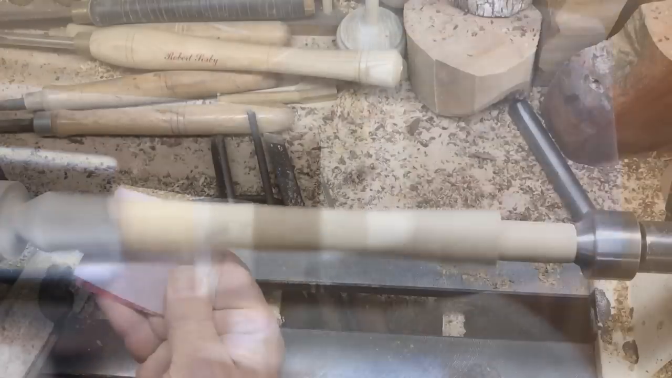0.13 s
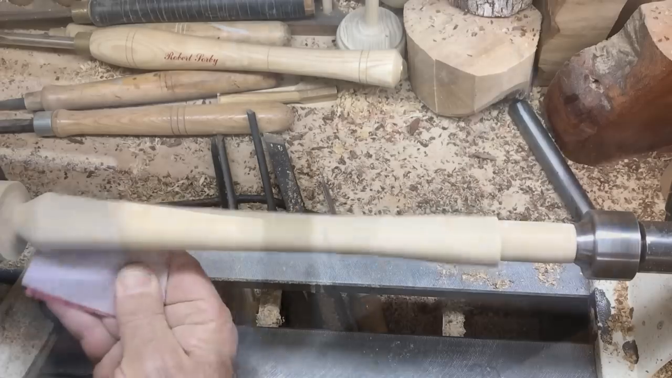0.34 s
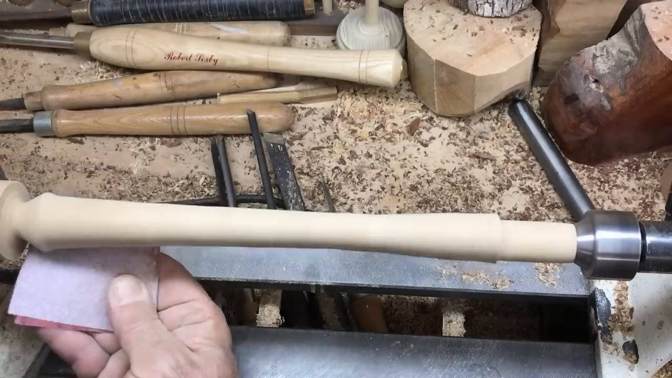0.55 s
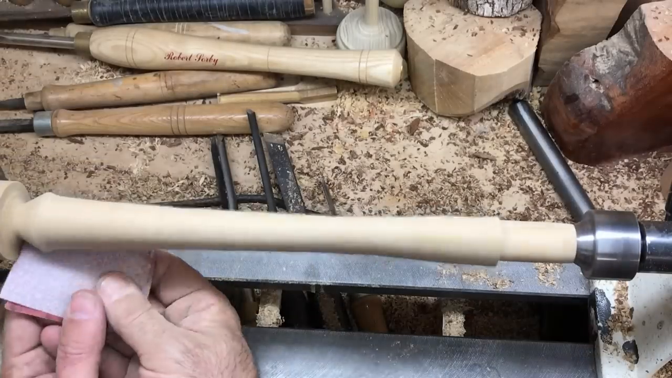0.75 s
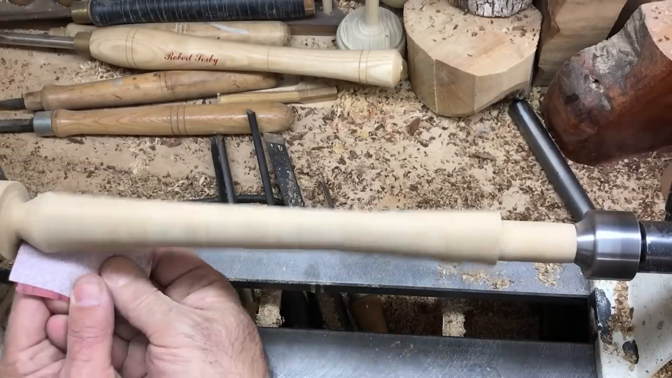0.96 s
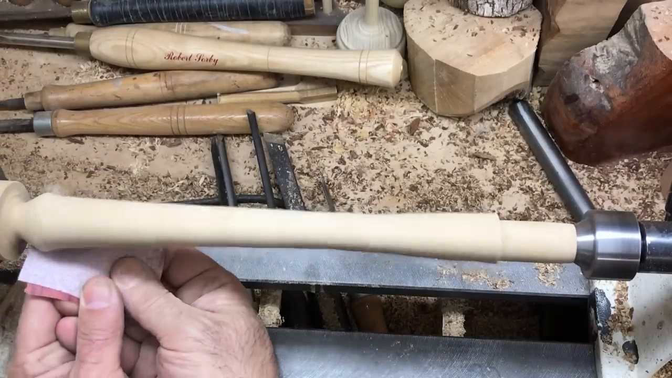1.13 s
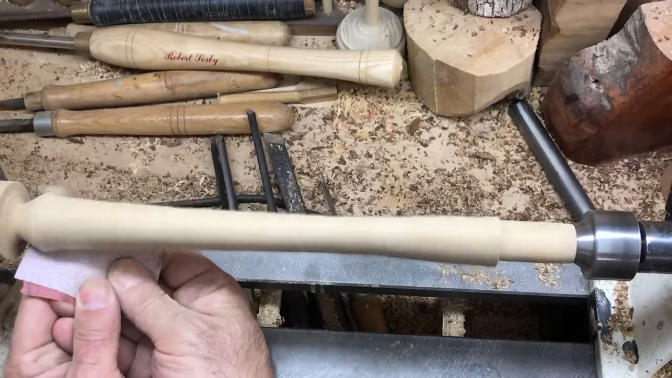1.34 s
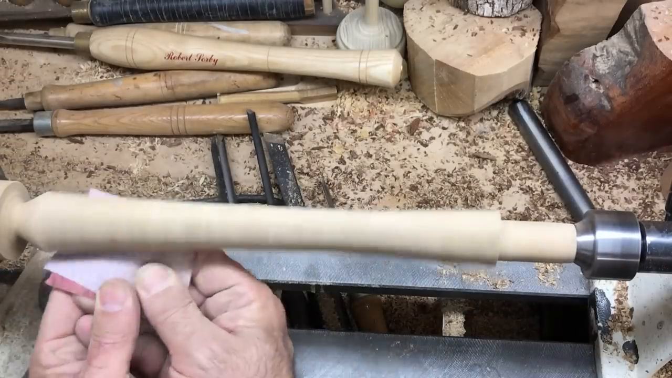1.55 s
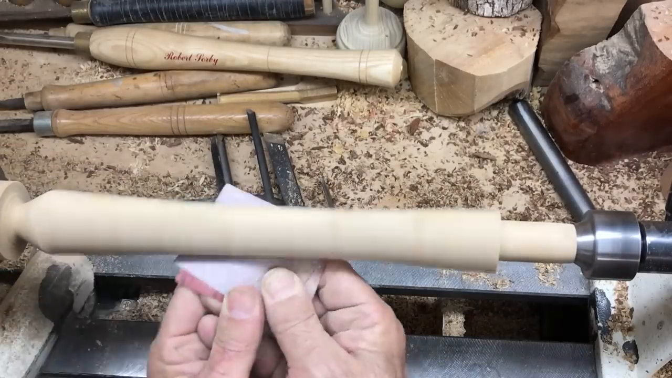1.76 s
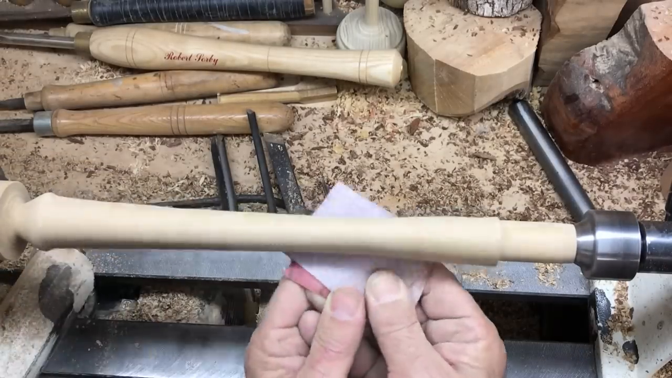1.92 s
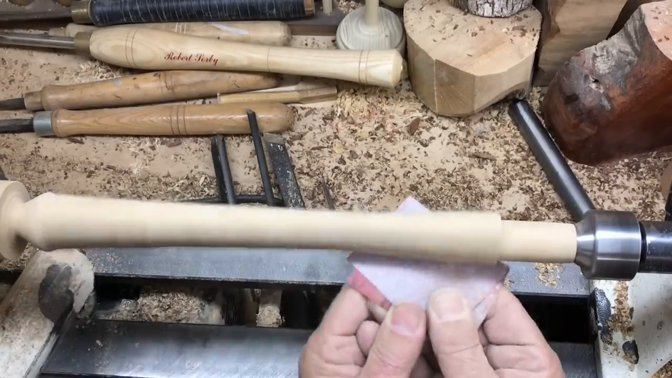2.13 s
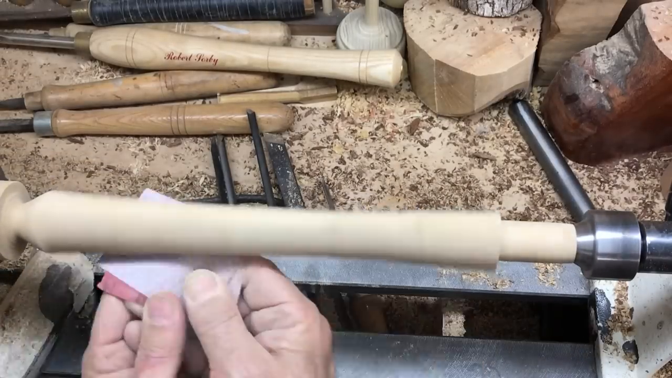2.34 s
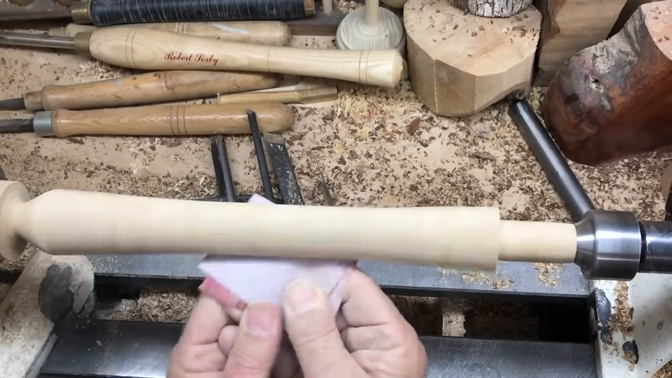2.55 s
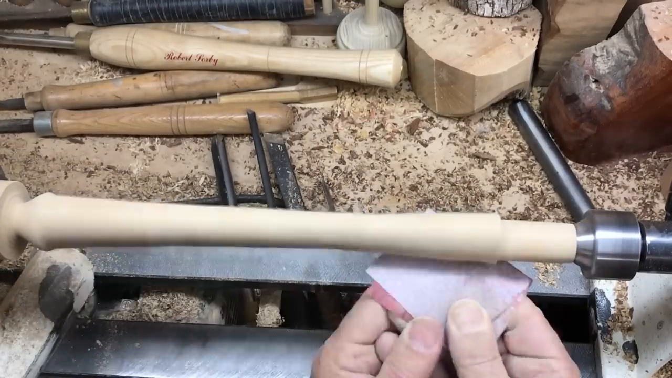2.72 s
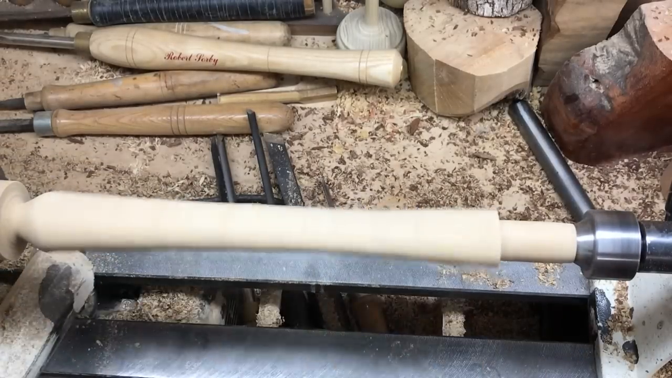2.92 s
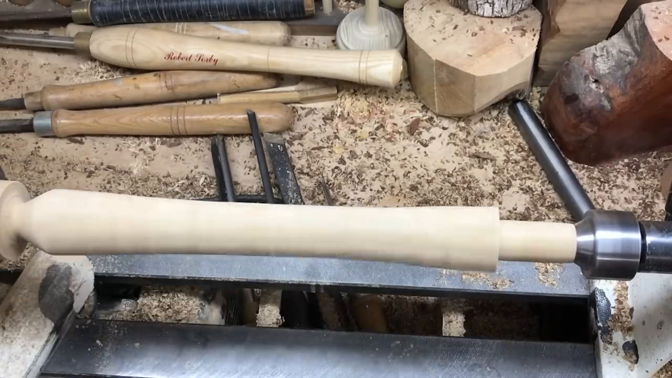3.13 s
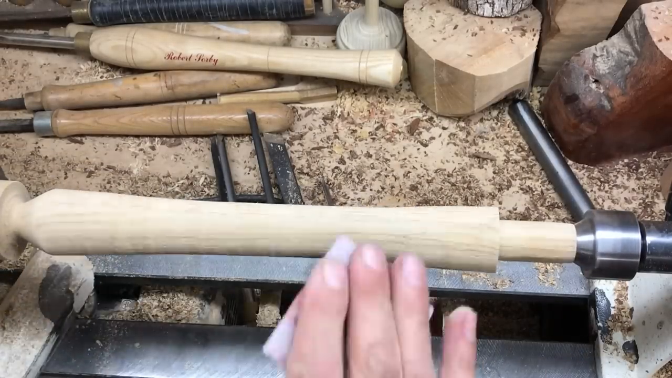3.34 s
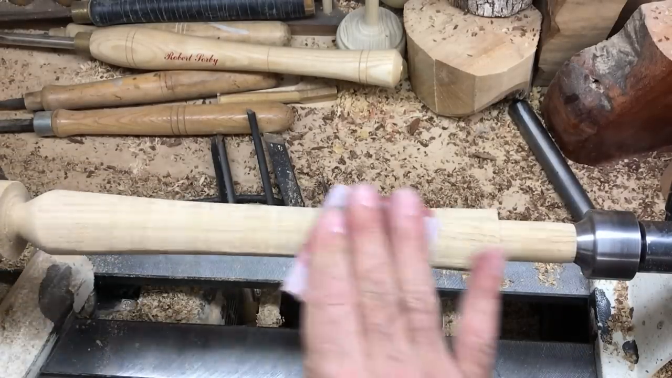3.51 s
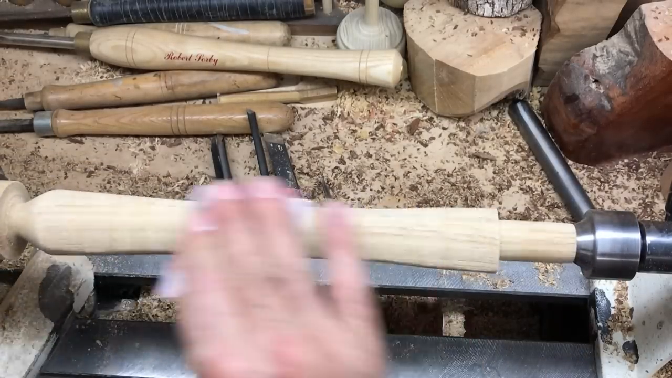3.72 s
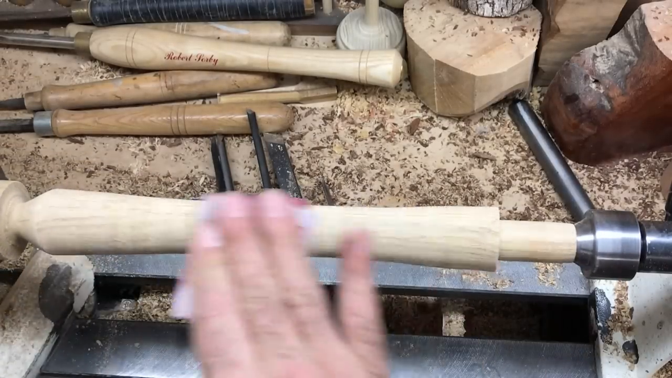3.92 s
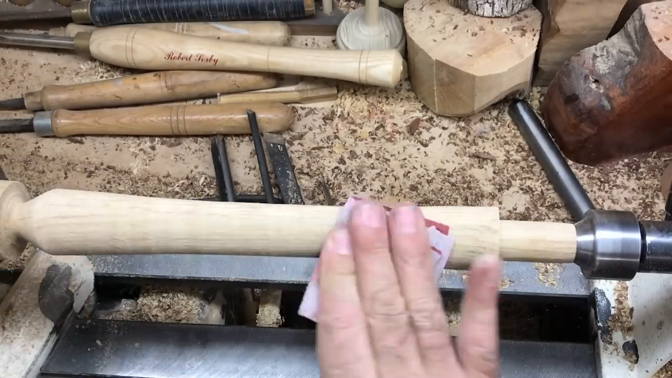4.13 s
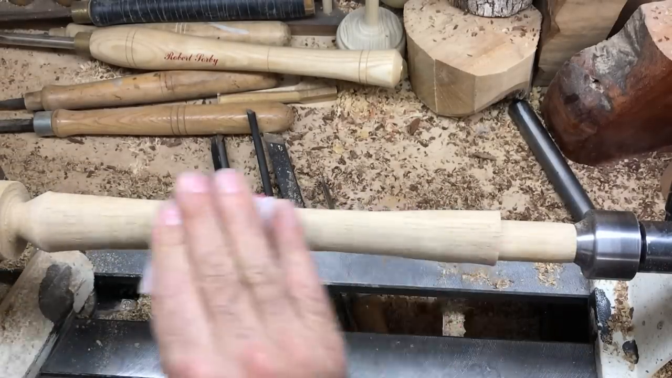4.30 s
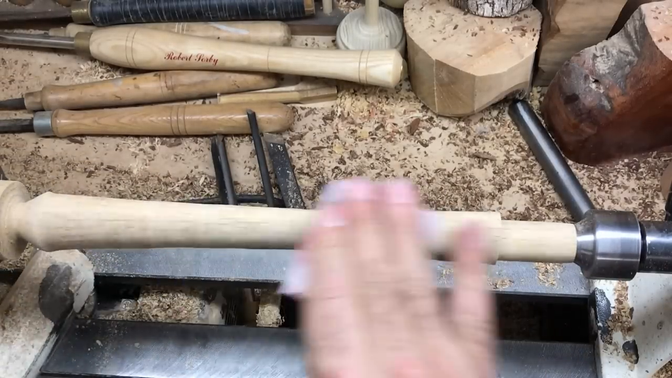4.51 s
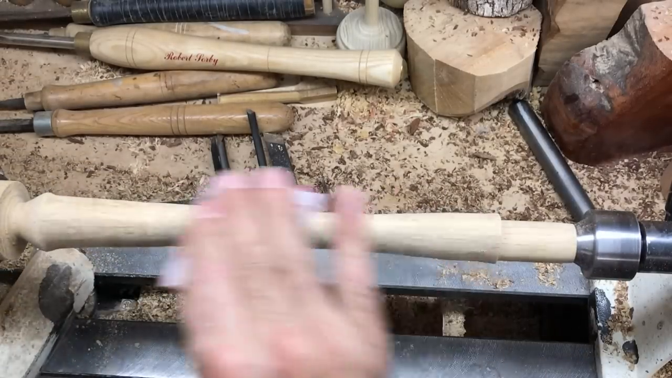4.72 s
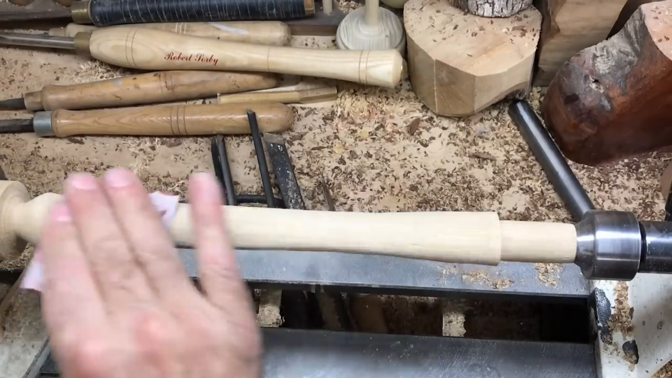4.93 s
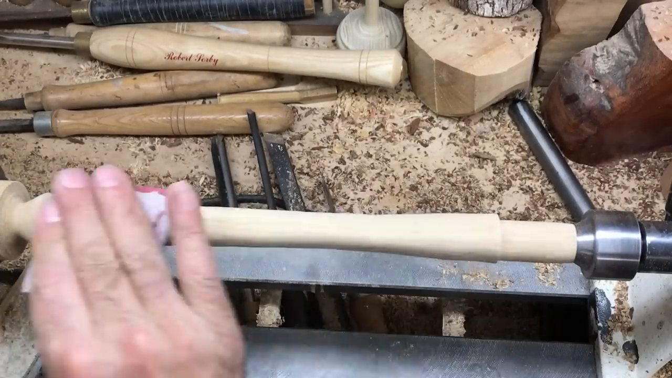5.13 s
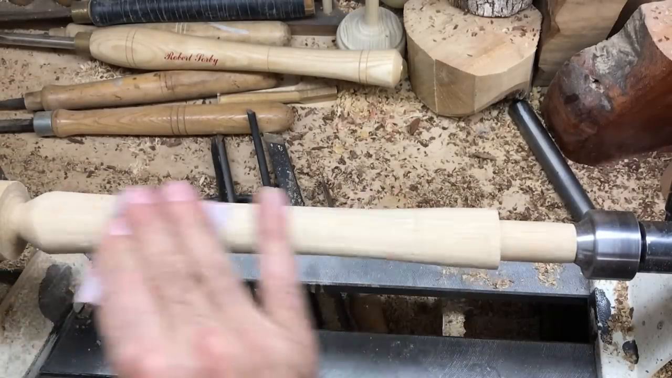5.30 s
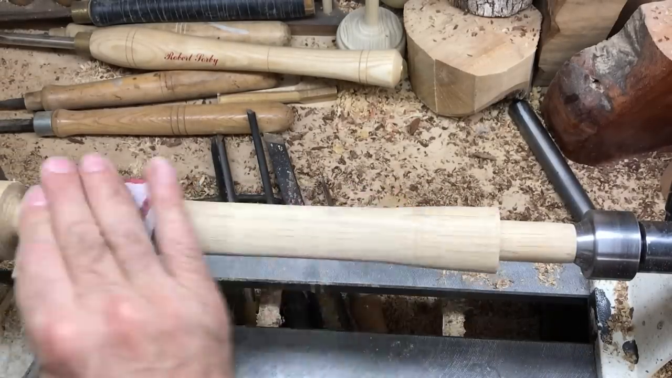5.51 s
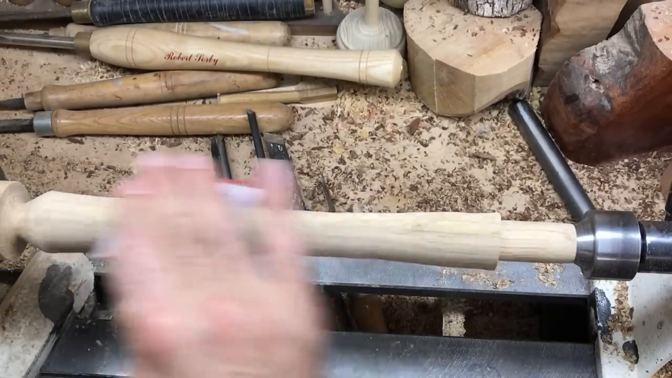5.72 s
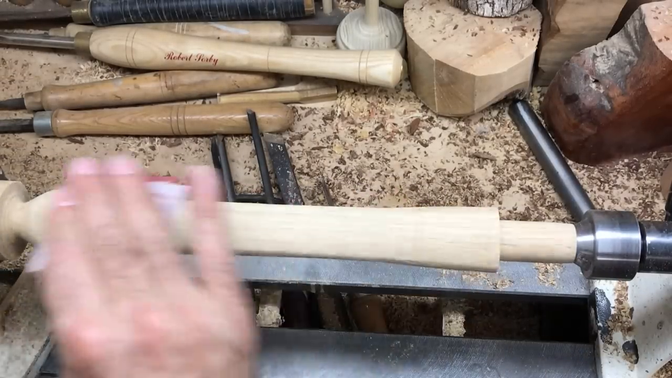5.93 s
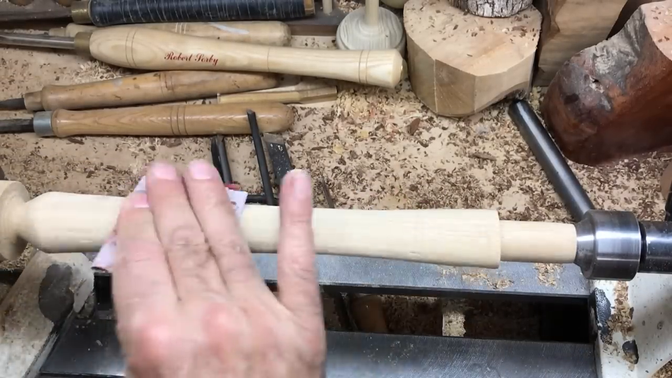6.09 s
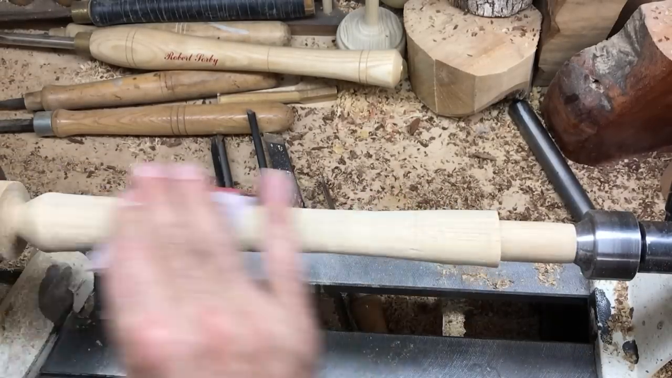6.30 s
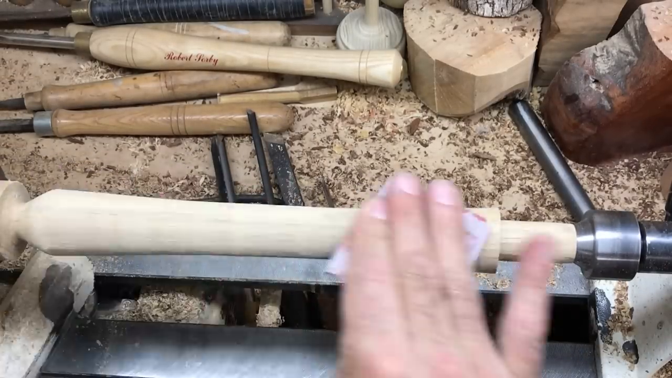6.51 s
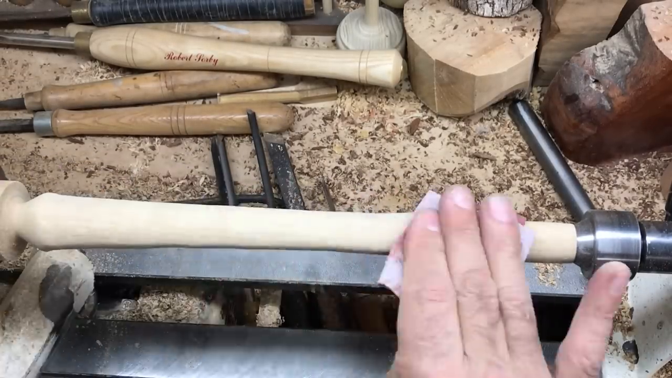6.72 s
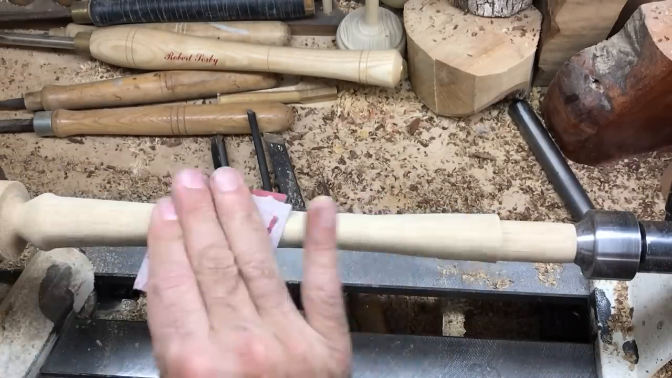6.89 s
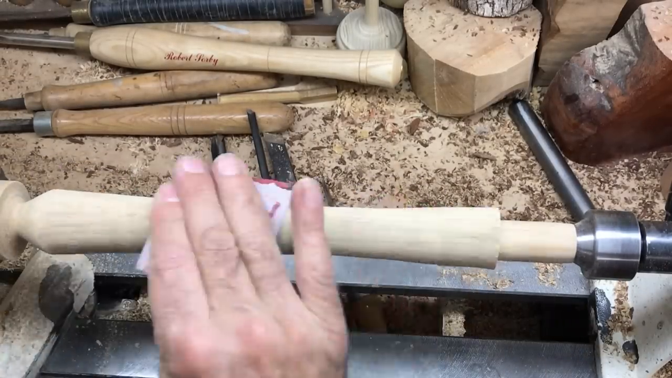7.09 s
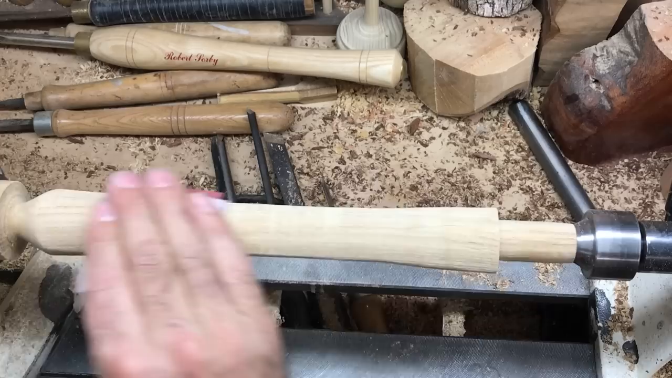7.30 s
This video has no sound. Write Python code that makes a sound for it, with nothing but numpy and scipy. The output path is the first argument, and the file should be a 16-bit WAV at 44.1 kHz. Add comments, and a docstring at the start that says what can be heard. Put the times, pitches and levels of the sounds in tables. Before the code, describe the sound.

A close microphone catches gritty sandpaper hiss on turning wood, briefly interrupted early, with small snags and a low electric hum beneath. Around three seconds the hiss stops, a switch snaps and the lathe falls silent. Paper rustles faintly, then very rapid dry scrubbing runs along the wood, pulsing about fourteen push-and-pull cycles a second, in a quiet workshop with very short echoes.

```python
"""In a small workshop, sandpaper is held against a wooden handle spinning on a humming lathe, close by.
The paper lifts, the switch clacks and the spindle runs down; then the still handle is rubbed along its
grain in very quick back-and-forth strokes. Abrasion is random clicks in noise, filtered by wood and paper
resonances and shaped by contact or hand speed. The motor is sine partials; bearings and air are noise."""
import sys
import numpy as np
from scipy import signal
from scipy.fft import rfft, irfft
from scipy.io import wavfile
from scipy.ndimage import uniform_filter1d

SR = 44100
rng = np.random.default_rng(int(sys.argv[2]) if len(sys.argv) > 2 else 0)


def int16_out(signal):
    """Quantize to a 16-bit WAV file."""
    q = np.round(np.clip(np.atleast_2d(signal).T, -1, 1) * 32767)
    wavfile.write(sys.argv[1], SR, q.astype(np.int16))


N = 324135
TIME = np.arange(N) / SR
BINS = np.fft.rfftfreq(N, 1 / SR)
CUTOFF_HZ = 15850

# All spectra below: frequency_hz, relative_density_db.
# All resonances and notches below: centre_hz, width_hz, height_db.

# air of the workshop, a spectrum
AIR_SPECTRUM = [(20, -16), (55, 2.5), (120, 0.5), (300, -16.5), (600, -8), (1000, -13), (3000, -31),
                (16000, -27)]
# mains hum of the motor: time_s, level_db (before the partials' own levels)
HUM_LEVEL = [(0.0, -54.5), (0.28, -47), (0.71, -40.5), (1.05, -42.5), (2.56, -43.5), (2.96, -41.5)]
# the motor's partials: multiple_of_mains, relative_level_db
HUM_PARTIALS = [(1, -30), (2, 1), (4, -28)]
MAINS_HZ, SWITCH_OFF_S = 60, 2.988
# the motor's faint whine
WHINE_HZ, WHINE_DB = 1254, -64
# bearings and belt: time_s, level_db
RUMBLE_LEVEL = [(0, -61), (.2, -57.5), (.5, -51), (2.95, -51), (3.04, -53), (3.15, -56), (3.27, -59),
                (3.33, -74), (3.42, -91), (3.5, -110)]
# bearings and belt, a spectrum
RUMBLE_SPECTRUM = [(20, -20), (55, -0.5), (110, -4), (170, -8.5), (260, 3), (450, -3), (800, -9),
                   (1300, -8.5), (2200, -13), (4300, -20), (6300, -24), (8000, -28.5), (16000, -37)]
# resonances of the lathe's frame and bearings
FRAME_RESONANCES = [(57.3, 16, 5), (303, 99, 2.7), (418, 49, 1.1), (554, 95, 6), (690, 69, 9),
                    (1010, 74, 3.5), (2010, 70, 3.5), (3640, 400, -1), (3960, 190, 8), (4750, 160, 3)]

# the switch: peak_s, level_db, rise_s, decay_s
CLACKS = [(2.966, -45, 0.0025, .006), (2.977, -30, 0.00086, 0.001), (2.98, -34.5, .005, 0.0048),
          (3.14, -66, .001, .004)]
# the switch, a spectrum
CLACK_SPECTRUM = [(100, -18), (600, -3), (1200, -3.5), (2400, 2), (3400, -4), (4300, -2), (8000, -4),
                  (16000, -17)]
# resonances of the switch housing
HOUSING_RESONANCES = [(560, 220, 4), (2060, 60, 7), (2480, 300, 7), (3340, 300, 12), (4000, 300, -8),
                      (4700, 300, 3)]
# the paper is gripped anew: peak_s, level_db, rise_s, decay_s
RUSTLES = [(3.275, -62.5, .015, 0.019), (3.36, -60, 0.018, 0.013), (3.395, -60, .008, .008),
           (3.411, -61, .006, .003)]
# the gripped paper, a spectrum
RUSTLE_SPECTRUM = [(150, -9), (800, -4), (1500, 4), (2200, -3), (5000, 1), (8000, -4), (16000, -11)]
# the hand bumps the handle: start_s, level_db, pitch_hz
BUMPS = [(5.89, -55, 74), (6.47, -56, 55)]

# the paper meets the spinning wood: touch_s, lift_s, ramp_s
CONTACTS = [(-.05, 0.672, 0.046), (0.771, 2.867, 0.039)]
# the paper's edge snags: centre_s, level_over_hiss_db, half_length_s
SNAGS = [(0.846, 5.5, 0.0057), (1.053, 1.5, 0.0074), (1.475, 7, 0.0068), (2.178, 4.5, 0.0083),
         (2.311, 2.5, .006), (2.754, -1, 0.0068)]
# paper at the thick end (0) or swept along the shaft (1): time_s, shaft_share
SHAFT_SHARE = [(0, 0.87), (.5, 0.24), (.85, 0.05), (1.45, 0.17), (1.6, 0.74), (2.2, 1), (2.8, 0.77)]
# pressure on the spinning wood: time_s, level_db (before trim), treble_db (before centring and gain)
PRESSURE = [(0.0, -45.9, -4), (0.17, -38, -4), (0.5, -34, -4.0), (0.565, -39, -8.5), (0.62, -37.0, -7),
            (0.82, -38, -8.6), (0.9, -38, -5), (1.0, -37.5, -4), (1.15, -37.5, -6.5), (1.42, -36.0, -6.2),
            (1.52, -34.5, -6), (1.7, -33.5, -6.5), (1.87, -33, -3), (2.0, -33, -4.5), (2.25, -32, -7.5),
            (2.41, -33, -5.1), (2.5, -33.5, -6.5), (2.8, -33.5, -4)]
# hiss at the thick end, a spectrum
END_SPECTRUM = [(200, -15.5), (600, -18), (950, -14.5), (1500, -16), (2100, -3), (3500, 0.5), (6000, -5),
                (9000, -1.5), (12000, -4), (16000, -9.5)]
# resonances of wood and paper at the thick end
END_RESONANCES = [(1330, 330, 10.5), (1870, 93, 3.5), (2120, 250, 4.5), (2800, 160, 1.5), (3200, 160, 2.5),
                  (3580, 310, 3), (4450, 300, 4.5), (6200, 900, 7), (4980, 550, -2.5), (7700, 900, 0)]
# hiss along the shaft, a spectrum
SHAFT_SPECTRUM = [(200, -42), (600, -27), (950, -18), (1400, -8.5), (2200, -2.5), (3500, -2), (6000, 0),
                  (9000, -2.5), (12000, -4.5), (16000, -10)]
# resonances of wood and paper along the shaft
SHAFT_RESONANCES = [(1380, 98, 2.6), (1710, 91, 2.1), (2045, 44, 3.3), (2640, 120, 1.9), (3015, 120, 5),
                    (3360, 120, 2.4), (3870, 82, 2.8), (4290, 220, 5), (5370, 95, 4.8)]
# bands cancelled by echoes off the lathe bed
BED_NOTCHES = [(4850, 350, -4), (7660, 600, -3), (10550, 490, -6)]

# pace of the hand on the still handle, about 14 push-and-pull cycles a second: time_s, strokes_done
PACE = [(3.46, 0), (3.493, 1), (3.577, 3), (3.949, 13), (4.08, 17), (4.285, 25), (4.337, 27), (4.481, 31),
        (4.652, 37), (4.712, 39), (4.799, 41), (5.391, 57), (5.912, 71), (6.044, 75), (6.287, 83),
        (6.42, 87), (6.644, 93), (7.339, 113)]
# how the hand bears down: time_s, level_db (before trim), treble_db (before gain),
# far_turn_dip_db (before pause trim)
GRIP = [(3.48, -37.8, 2.2, -5.5), (3.97, -36.9, 1.5, -2.5), (4.24, -42.5, -1.5, -1), (4.35, -35, 2.2, -5.5),
        (4.55, -38.5, -1.4, -2.5), (4.8, -37, -0.2, -9), (5.05, -38.5, 1.5, -1), (5.36, -39.5, -3, -6),
        (5.41, -34.5, 3.5, -5), (5.55, -36.5, 1.4, -5), (5.87, -38.0, 2, -3.9), (5.93, -39, -0.5, -9),
        (6.28, -43, -3.5, -6), (6.4, -38.5, 0.5, -7.5), (6.6, -36.5, 0.6, -3.5), (6.68, -40.0, 0.3, 0),
        (7.1, -41, -1.5, 0), (7.25, -38.5, -0.7, -2.5)]
# the rubbed still handle, a spectrum
RUB_SPECTRUM = [(60, -13.5), (170, -22.5), (400, -16.5), (680, -11.5), (830, -22), (1150, -14), (1500, -12),
                (2200, -7), (2900, -3), (3350, -7.5), (3900, -1), (9000, 1), (12000, 0.5), (16000, -5)]
# resonances of the rubbed wood and paper
RUB_RESONANCES = [(283, 113, 13.6), (595, 47, 6.6), (1414, 133, 7.8), (1652, 67, 8.3), (2005, 140, 4.5),
                  (2394, 115, 5.9), (2590, 220, 4.1), (3770, 120, 3.1), (4400, 110, 2.5), (5900, 1100, 1.4)]
# the scratch nearly stops at the near turn (before pause trim); the far turn is late, so a push lasts longer
NEAR_TURN_DB, FAR_TURN_DELAY_STROKES = -10, 0.074
# a push is louder and brighter than a pull, and no two strokes are quite alike
PUSH_DB, PUSH_TREBLE_DB, UNEVEN_DB = 0.5, 1.06, 1.2


def amp(db):
    """Logarithmic level: decibels to amplitude gain."""
    return 10 ** (np.asarray(db) / 20)


def unit(x):
    """Normalisation: scales the signal to rms 1."""
    return x / np.sqrt(np.mean(x ** 2) + 1e-20)


def curve(rows, axis=1):
    """Linear interpolation: one column of a timed table, at every sample."""
    rows = np.asarray(rows, float)
    return np.interp(TIME, rows[:, 0], rows[:, axis])


def colour(x, spectrum, resonances=()):
    """Linear filtering: a smooth spectrum bearing resonances or notches; rms 1."""
    hz, db = np.transpose(spectrum)
    shape_db = np.interp(np.log(BINS + 1), np.log(hz), db)
    for centre, width, height in resonances:
        shape_db = shape_db + height / (1 + (2 * (BINS - centre) / width) ** 2)
    return unit(irfft(rfft(x) * amp(shape_db), N))


def wander(rate_hz):
    """Low-pass random process: smooth fluctuation of rms 1, up to about this rate."""
    spectrum = rfft(rng.standard_normal(N))
    return unit(irfft(spectrum / (1 + (BINS / rate_hz) ** 4), N))


def grit(per_s, spread_db, smooth):
    """Shot noise: random clicks of uneven size, as of grains tearing fibres, in a wash of tiny ones."""
    size = amp(spread_db * np.minimum(rng.exponential(1, N), 4))
    struck = rng.random(N) < per_s / SR
    clicks = size * rng.choice([-1, 1], N) * struck
    return unit(unit(clicks) + smooth * rng.standard_normal(N))


def brighten(x, treble_db, split_hz):
    """Spectral balance: raises or lowers the treble against the rest, keeping the level."""
    high = irfft(rfft(x) * BINS ** 4 / (BINS ** 4 + split_hz ** 4), N)
    low, gain = x - high, amp(treble_db)
    cross_power = 2 * gain * np.mean(low * high)
    power = np.mean(low ** 2) + cross_power + gain ** 2 * np.mean(high ** 2)
    return (low + gain * high) / np.sqrt(power)


def bursts(rows):
    """Exponential growth and decay: envelope of short sounds that swell and die."""
    envelope = np.zeros(N)
    for peak_s, db, rise_s, decay_s in rows:
        fall = np.maximum((peak_s - TIME) / rise_s, (TIME - peak_s) / decay_s)
        envelope += amp(db) * np.exp(-fall)
    return envelope


def spectral_drift(x, patchy_db, top_hz=5000, count=24, size=10):
    """Random spectral drift: patches of the scratch's colour swell and shrink; the fizz above stays more even."""
    hz, _, bands = signal.stft(x, SR, nperseg=1024, noverlap=768)
    patches = rng.standard_normal(bands.shape)
    # two passes of averaging over frequency bins, then time frames
    for length, axis in [(size, 0), (count, 1)] * 2:
        patches = uniform_filter1d(patches, length, axis, mode="wrap")
    depth_db = patchy_db / np.sqrt(1 + (hz[:, None] / top_hz) ** 4)
    drifted = bands * amp(depth_db * unit(patches))
    return unit(signal.istft(drifted, nperseg=1024, noverlap=768)[1][:N])


def workshop_air():
    """Ambient noise: a faint steady random sound with the room's spectrum."""
    return amp(-68.0) * colour(rng.standard_normal(N), AIR_SPECTRUM)


def workshop_echoes(x, wet_db=-13, t60_s=0.068):
    """Reverberation: bench, tools and walls return a short, decaying scatter of echoes."""
    t = TIME[:SR // 3]
    sparse = rng.standard_normal(len(t)) * (rng.random(len(t)) < 2500 / SR)
    taps = sparse * (t > .002) * amp(-60 * t / t60_s)
    return x + amp(wet_db) * signal.fftconvolve(x, taps / np.linalg.norm(taps))[:N]


def motor(fade_s=0.014, sag_per_s=9):
    """Magnetic hum: chiefly twice the mains, with a faint whine; switched off, both sag and die."""
    off = np.maximum(TIME - SWITCH_OFF_S, 0)
    # integrating the sagging speed gives the phase
    run_s = np.cumsum(np.exp(-sag_per_s * off)) / SR
    hum = np.zeros(N)
    for multiple, db in HUM_PARTIALS:
        hum += amp(db) * np.sin(2 * np.pi * (multiple * MAINS_HZ * run_s + rng.random()))
    whine = amp(WHINE_DB) * wander(rate_hz=17.0) * np.sin(2 * np.pi * WHINE_HZ * run_s)
    running = hum * amp(curve(HUM_LEVEL) + 0.43 * wander(rate_hz=29)) + whine
    return np.sqrt(2) * running / np.sqrt(1 + (off / fade_s) ** 4)


def bearings(dull_db=-3, slow_s=0.047):
    """Rolling noise: belt and bearings excite the frame, growing duller as the spindle runs down."""
    rumble = colour(rng.standard_normal(N), RUMBLE_SPECTRUM, FRAME_RESONANCES)
    slowed = 1 - np.exp(-np.maximum(TIME - SWITCH_OFF_S, 0) / slow_s)
    return brighten(rumble, dull_db * slowed, split_hz=540) * amp(curve(RUMBLE_LEVEL))


def switch_clacks():
    """Impact: brief dense clicks excite the switch housing's resonances."""
    clicks = grit(per_s=6800, spread_db=3.5, smooth=0.62)
    return colour(clicks, CLACK_SPECTRUM, HOUSING_RESONANCES) * bursts(CLACKS)


def paper_rustles():
    """Crumpling noise: the gripped paper gives short swells of scattered clicks."""
    clicks = grit(per_s=2100, spread_db=2.5, smooth=0.68)
    return colour(clicks, RUSTLE_SPECTRUM) * bursts(RUSTLES)


def hand_bumps(rise_s=0.01):
    """Damped oscillation: each bump of the hand on the handle is a low sine that swells and dies."""
    bumps = np.zeros(N)
    for start_s, db, pitch_hz in BUMPS:
        age = np.maximum(TIME - start_s, 0)
        envelope = age / rise_s * np.exp(1 - age / rise_s)
        bumps += amp(db) * envelope * np.sin(2 * np.pi * pitch_hz * age)
    return bumps


def spinning_hiss(flutter_db=0.98, chatter_db=0.5, treble_gain=2.05, trim_db=0.09):
    """Sliding friction: wood runs under the paper, which flutters, chatters and snags on it."""
    shaft = np.clip(curve(SHAFT_SHARE), 0, 1)
    end_grit = grit(per_s=7000, spread_db=1.5, smooth=0.79)
    shaft_grit = grit(per_s=7000, spread_db=1.5, smooth=0.77)
    at_end = colour(end_grit, END_SPECTRUM, END_RESONANCES + BED_NOTCHES)
    at_shaft = colour(shaft_grit, SHAFT_SPECTRUM, SHAFT_RESONANCES + BED_NOTCHES)
    # equal-power crossfade between the places
    hiss = spectral_drift(np.sqrt(1 - shaft) * at_end + np.sqrt(shaft) * at_shaft, patchy_db=1.78)
    treble_db = curve(PRESSURE, axis=2) - np.mean(np.array(PRESSURE)[:, 2])
    hiss = brighten(hiss, treble_gain * treble_db, split_hz=6700)
    contact = np.zeros(N)
    for touch_s, lift_s, ramp_s in CONTACTS:
        contact += np.clip(np.minimum(TIME - touch_s, lift_s - TIME) / ramp_s, 0, 1) ** 2
    snag_db = sum(db * np.exp(-((TIME - s) / half_s) ** 2) for s, db, half_s in SNAGS)
    unrest_db = flutter_db * wander(rate_hz=77) + chatter_db * wander(rate_hz=190)
    return hiss * contact * amp(curve(PRESSURE) + snag_db + unrest_db + trim_db)


def hand_strokes(speed_power=1.15, chatter_db=0.5, trim_db=0.72, pause_trim_db=-.5,
                 treble_gain=1.13, speed_treble_db=6):
    """Reciprocating friction: pulls and pushes speed up and slow to a turn; scratch follows hand speed."""
    done = curve(PACE)
    phase = np.pi * (done - FAR_TURN_DELAY_STROKES * (1 + np.cos(np.pi * done)) / 2)
    # push is positive, pull negative; far is 1 at the far turn and 0 at the near turn
    push, far = -np.sin(phase), np.cos(phase / 2) ** 2
    # at the far turn the hand curves round and keeps scratching
    turn_db = far * curve(GRIP, axis=3) + (1 - far) * NEAR_TURN_DB
    rest = np.clip(amp(turn_db + pause_trim_db), 0, 1)
    speed = np.sqrt(rest ** 2 + (1 - rest ** 2) * abs(push) ** (2 * speed_power))
    rub_grit = grit(per_s=8000, spread_db=1.5, smooth=0.67)
    hiss = spectral_drift(colour(rub_grit, RUB_SPECTRUM, RUB_RESONANCES + BED_NOTCHES), patchy_db=1.1)
    # a faster paper sounds brighter
    treble_db = treble_gain * curve(GRIP, axis=2) + PUSH_TREBLE_DB * push + speed_treble_db * (speed - 1.05)
    hiss = brighten(hiss, treble_db, split_hz=5400)
    stroke_db = UNEVEN_DB * rng.standard_normal(int(done[-1]) + 1)
    uneven_db = stroke_db[done.astype(int)] * abs(push)
    touch = np.clip((TIME - PACE[0][0] + .002) / 0.011, 0, 1)
    force_db = curve(GRIP) + PUSH_DB * push + uneven_db + chatter_db * wander(rate_hz=430)
    return hiss * speed * touch * amp(force_db + trim_db)


def scene():
    """Superposition: sanding and handling with their echoes, plus lathe and workshop air."""
    handling = switch_clacks() + paper_rustles() + hand_bumps()
    near = workshop_echoes(spinning_hiss() + hand_strokes() + handling)
    return (near + motor() + bearings() + workshop_air())[None]


def record(dry):
    """Band limiting: a steep low-pass filter removes the highest frequencies."""
    taps = signal.firwin(801, CUTOFF_HZ, window=("kaiser", 9), fs=SR)
    return signal.oaconvolve(dry, taps[None], "same")


dry = scene()
out = record(dry)
int16_out(out)
```